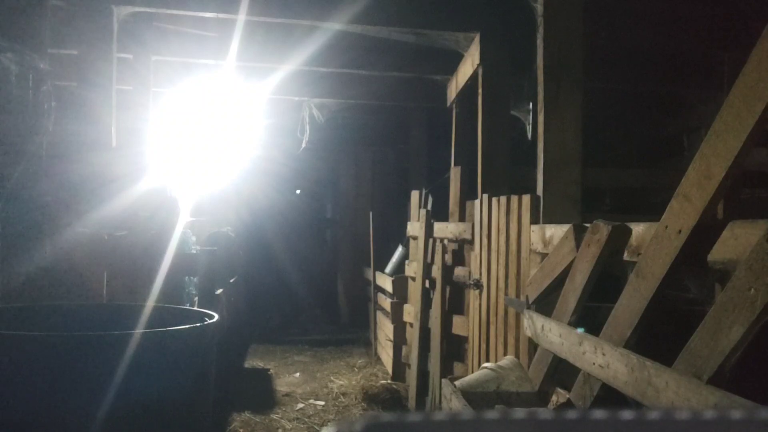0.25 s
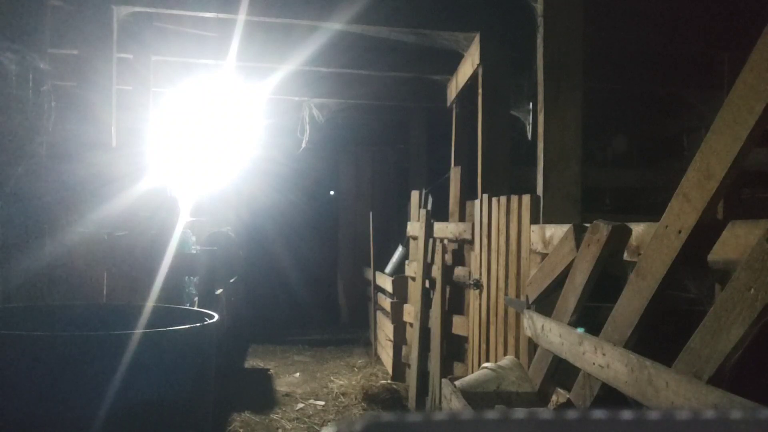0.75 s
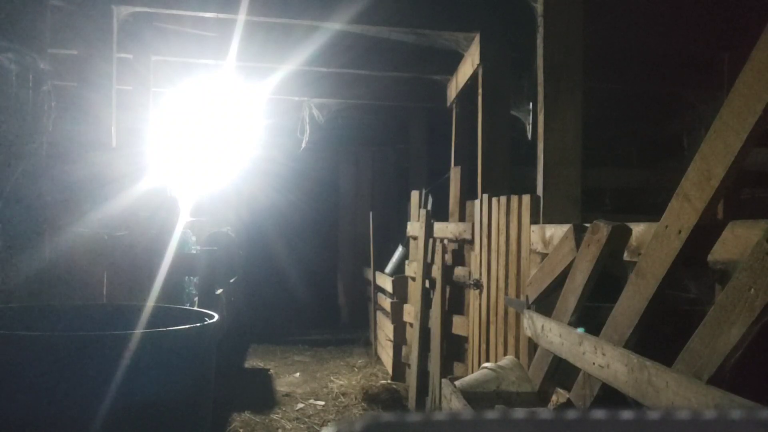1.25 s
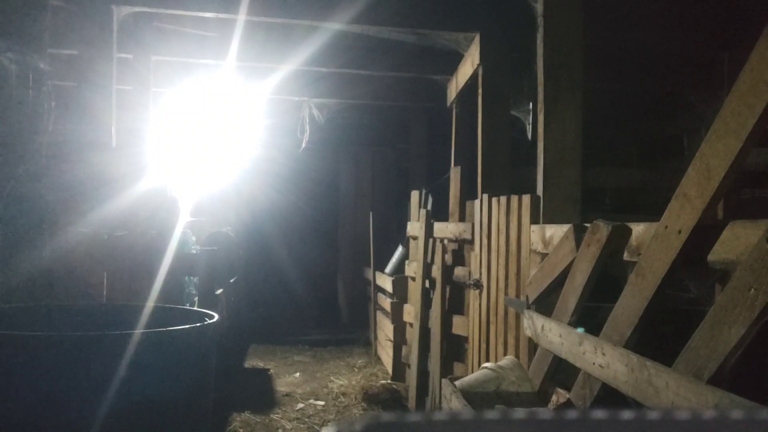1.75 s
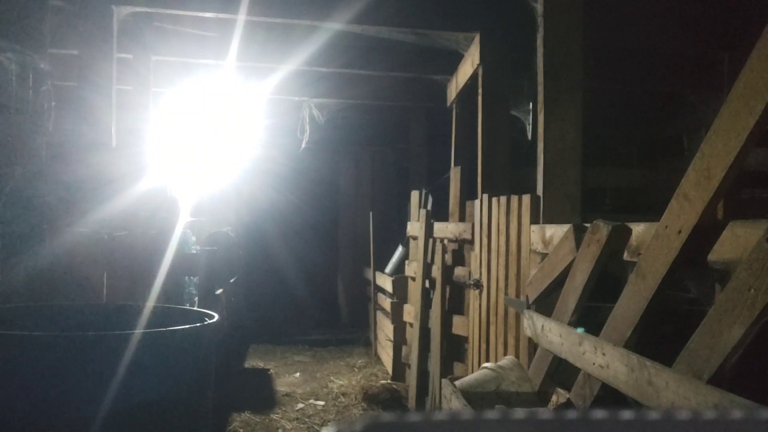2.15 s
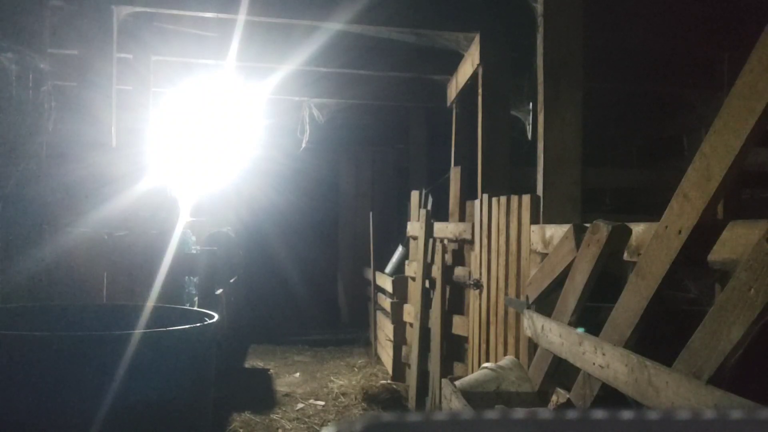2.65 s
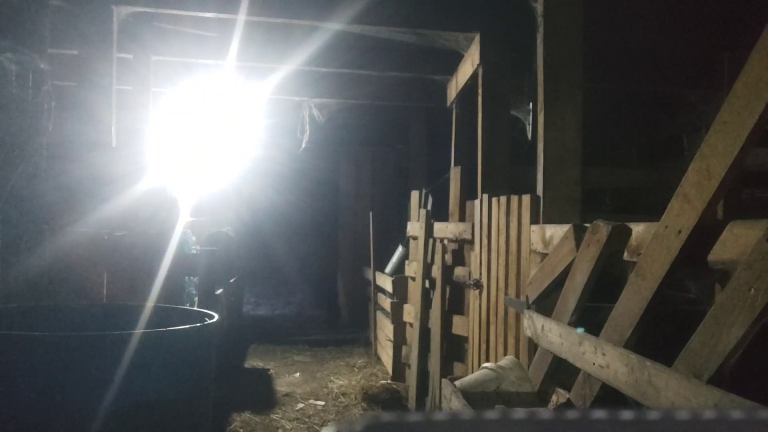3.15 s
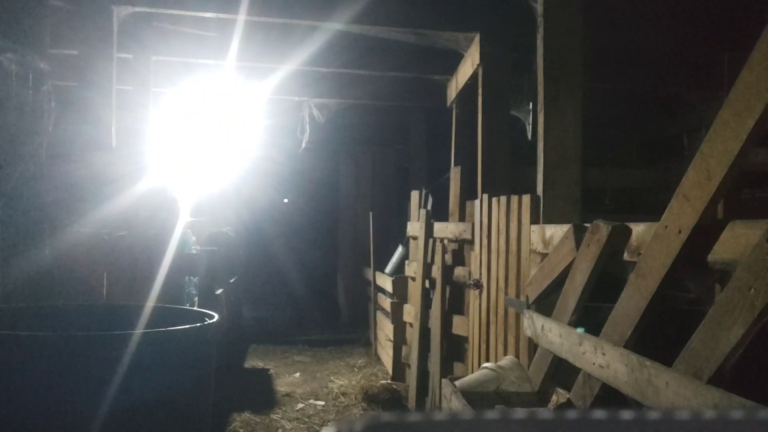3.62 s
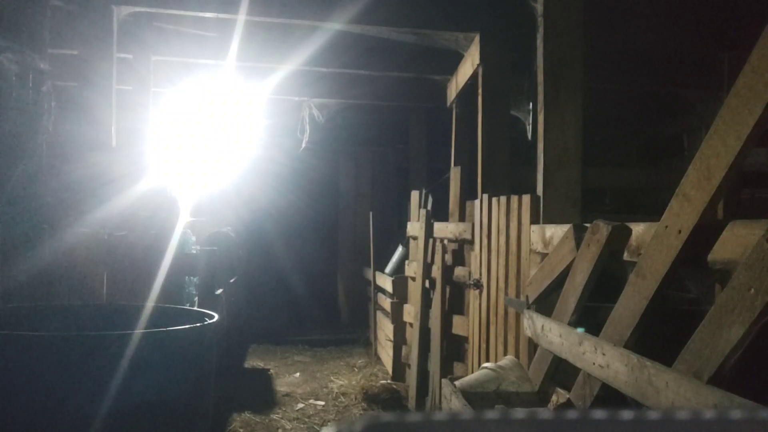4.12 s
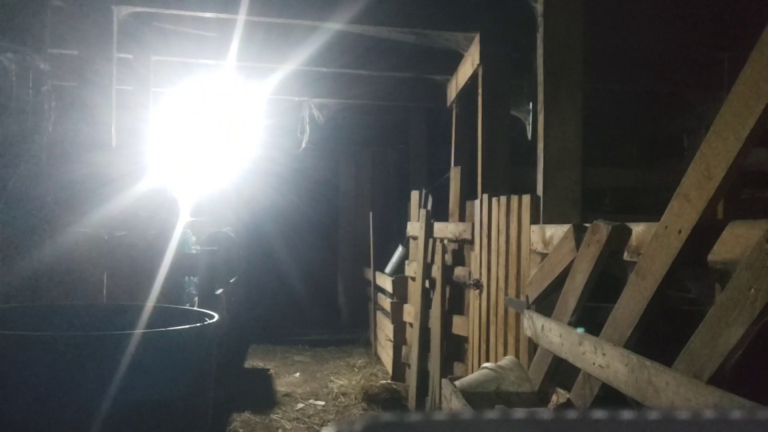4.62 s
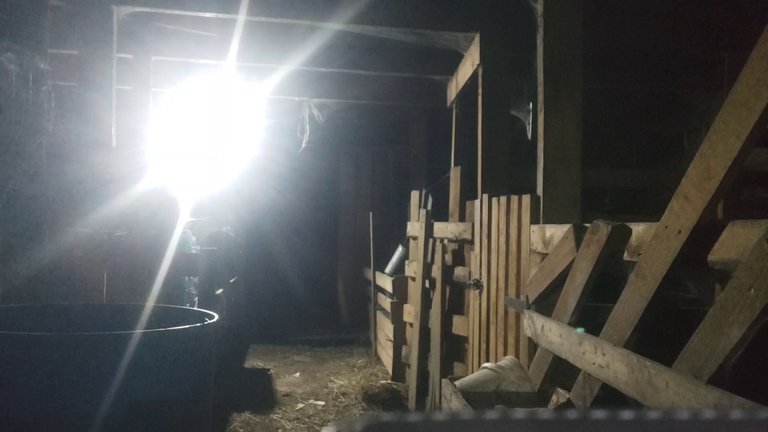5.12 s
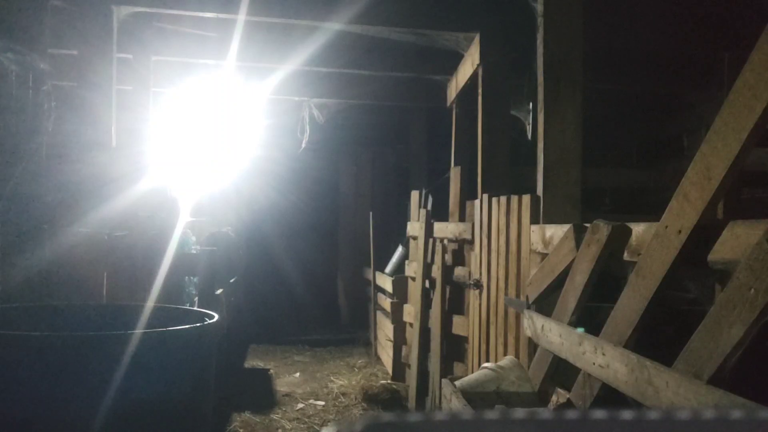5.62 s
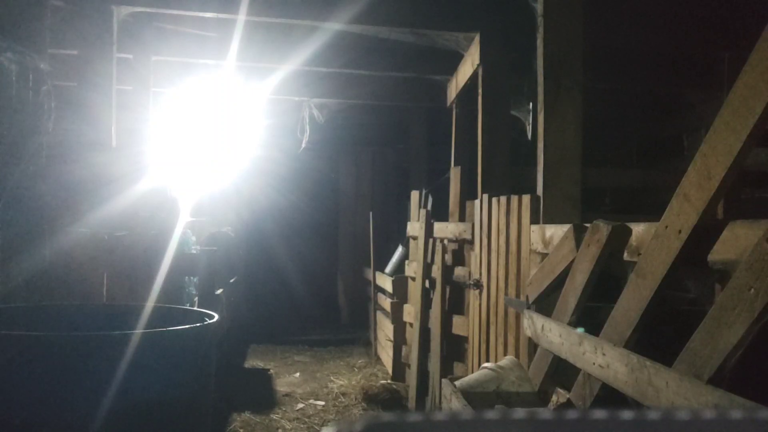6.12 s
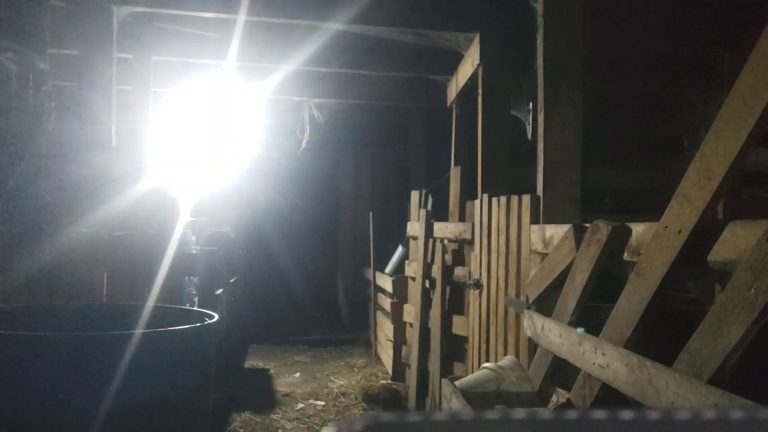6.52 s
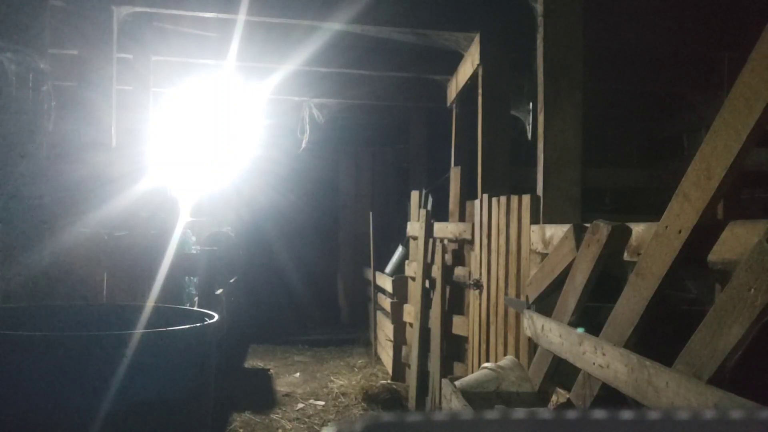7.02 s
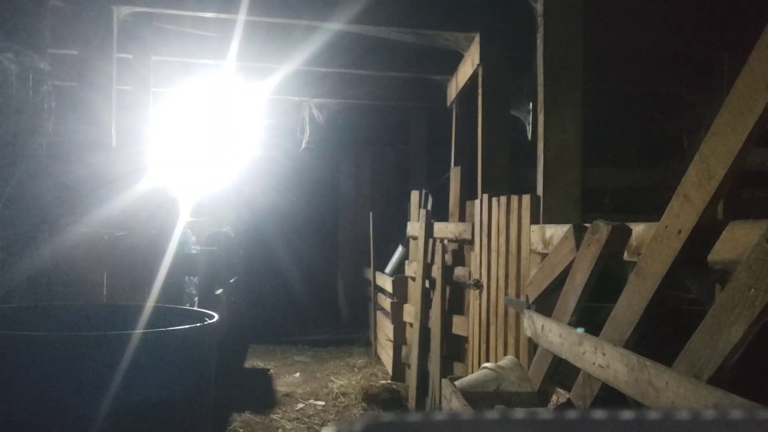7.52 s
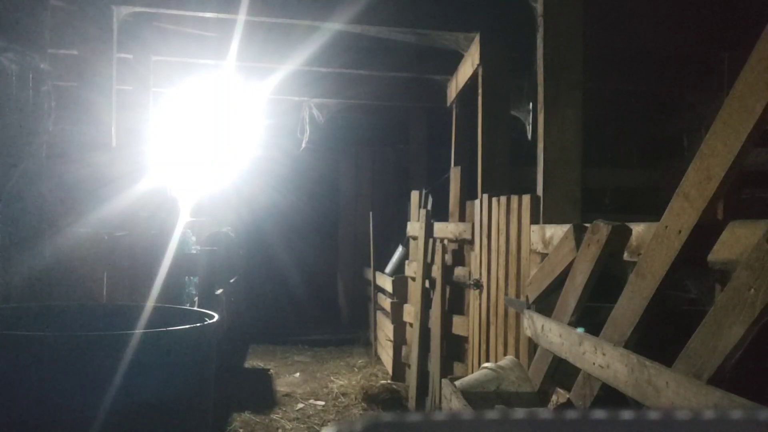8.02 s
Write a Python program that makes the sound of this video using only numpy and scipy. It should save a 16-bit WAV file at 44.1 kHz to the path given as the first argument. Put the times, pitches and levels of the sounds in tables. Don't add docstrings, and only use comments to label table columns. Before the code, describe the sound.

Hens in a wooden barn at night: straw scuffs, heavy landings and bin bangs early, then low clucks, throbbing drawn-out calls and hoarse clucking.

```python
import sys
import numpy as np
from scipy import signal
from scipy.fft import rfft, irfft, next_fast_len
from scipy.io import wavfile
from scipy.ndimage import uniform_filter1d, map_coordinates

SR = 44100
rng = np.random.default_rng(int(sys.argv[2]) if len(sys.argv) > 2 else 0)


def store_pcm(level_fs):
    pcm = np.round(np.clip(level_fs, -1, 1) * 32767).astype(np.int16)
    wavfile.write(sys.argv[1], SR, np.atleast_2d(pcm).T)


def rack_gain(trim_db):
    fader = np.asarray(trim_db, float)
    return 10 ** (fader / 20)


N = 364530
TIME = np.arange(N) / SR


def unit(x):
    return x / np.sqrt(np.mean(x ** 2) + 1e-20)


def along(points, hz):
    f, v = np.transpose(points)
    return np.interp(np.log(hz + 1), np.log(f + 1), v)


def random_curve(n, rate):
    return map_coordinates(rng.standard_normal(int(n * rate / SR) + 4), [np.arange(n) * rate / SR])


def wobble(rate):
    return random_curve(N, rate)


def filtered(x, response):
    m = next_fast_len(N + SR // 2)
    return irfft(rfft(x, m) * response(np.fft.rfftfreq(m, 1 / SR)), m)[..., :N]


def resonant(modes):
    def body(f):
        total = 0
        for k, (centre, width, db) in enumerate(modes):
            damping = 1j * f * width
            total = total + (-1) ** k * rack_gain(db) * damping / (centre * centre - f * f + damping)
        return total
    return unit(filtered(rng.standard_normal(N), body))


# (f/Hz, left-right correlation)
ALIKE = [(60, 0.15), (180, 0.53), (550, 0.38), (1650, -0.088), (4970, -0.004), (15000, -0.015)]


def rush(spectrum, patchy_db):
    z = signal.stft(rng.standard_normal((2, N)), nperseg=512)[2]
    field = uniform_filter1d(rng.standard_normal(z.shape[1:]), size=6, axis=0)
    field = uniform_filter1d(field, size=10, axis=1)
    pair = signal.istft(z * rack_gain(patchy_db * unit(field)), nperseg=512)[1][:, :N]

    def mid_side(hz):
        angle = np.arccos(np.clip(along(ALIKE, hz), -1, 1)) / 2
        return rack_gain(along(spectrum, hz)) * np.array([np.cos(angle), np.sin(angle)])
    mid, side = filtered(pair, mid_side)
    return unit(np.array([mid + side, mid - side]))


def burst(s, length, t60, attack):
    out, t = np.zeros(N + SR), np.arange(SR) / SR
    decay = rack_gain(-60 * np.clip(t - length, 0, None) / abs(t60))
    out[round(s * SR):][:SR] = (1 - np.exp(-t / attack)) * decay
    return out[:N]


# (f/Hz, level/dB)
THROAT = [(900, 2), (1300, -14), (1900, -24.5), (2250, -33.5), (2700, -41.5), (3600, -48), (4250, -34),
          (4800, -51), (6900, -51), (8000, -60)]


def voice(pitch_hz, first_db, second_db, third_db, half_db, rough, upper_db=0):
    n = len(pitch_hz)
    jitter = 1 + rough * (.03 * random_curve(n, 120) + .012 * random_curve(n, 30))
    phase = 2 * np.pi * np.cumsum(pitch_hz * jitter) / SR

    def shimmer():
        return 4 * rough * random_curve(n, 50)

    tone = np.zeros(n)
    for k, db in enumerate([first_db, second_db, third_db], 1):
        tone = tone + rack_gain(db + shimmer()) * np.sin(k * phase + k)
    effort_db = np.maximum(second_db, third_db) + upper_db
    for k in range(4, 16):
        level_db = effort_db + along(THROAT, k * pitch_hz) + shimmer()
        blur = .0005 * k * np.cumsum(random_curve(n, 300))
        tone = tone + rack_gain(level_db) * np.sin(k * phase + blur)
    for k in range(1, 5):
        octaves = np.log2((k + .5) * pitch_hz / 1000)
        halfway_db = half_db + 5 - 90 * octaves ** 2 / 2
        tone = tone + rack_gain(halfway_db + shimmer()) * np.sin((k + .5) * phase + k)
    breath = signal.lfilter(*signal.butter(5, [350, 1300], "band", fs=SR), rng.standard_normal(n))
    puffs = rack_gain(effort_db) * rough * breath * (1 + np.cos(phase))
    return np.sqrt(2) * (tone + puffs)


def clucks(rows, rise):
    out = np.zeros(N + SR)
    for s, length, hz, first_db, second_db, third_db, half_db, upper_db, sag, rough in rows:
        u = np.arange(round((length + 0.018) * SR)) / SR / length
        opening = np.clip(u * length / 0.0033, 0, 1)
        swell = 0.82 + 0.29 * np.sin(np.pi * np.clip(u, 0, 1))
        shape = opening * swell * np.exp(-1.6 * u ** 3)
        pitch = hz * (1 + rise * (np.tanh(4 * u) - .8) - rng.normal(sag, .012) * 2 * (u - .5))
        sag_db = 3.5 - 9 * u
        note = voice(pitch, first_db + sag_db, second_db, third_db, half_db, rough, upper_db)
        out[round(s * SR):][:len(u)] += rack_gain(3.5) * shape * note
    return out[:N]


# (t/s, length/s, f/Hz, fundamental level/dB, beak opening/dB = second partial over first)
BRIGHT_HEN = [
    (4.987, 0.061, 307.3, -49, 7.5),
    (5.106, 0.091, 310, -51, 7.5),
    (5.228, 0.04, 311.4, -46.5, 6),
    (5.349, 0.018, 338, -43, 7.5),
    (5.442, 0.04, 339, -47, 8),
    (6.048, 0.04, 327, -44.5, -15),
    (7.227, 0.07, 320, -46, -5.5),
    (7.39, 0.12, 318.2, -46, -3.5),
    (7.544, 0.063, 303.6, -42.5, -3.5),
]
OPEN_HEN = [
    (0.54, 0.066, 358, -50, -1),
    (0.695, 0.025, 337, -48, 4.5),
    (0.712, 0.046, 304.5, -47, 1.5),
    (7.29, 0.055, 326.6, -41.5, -11),
    (7.325, 0.027, 330, -48, -3),
]
DULL_HEN = [(2.27, 0.082, 327.5, -60.5, 9), (2.505, 0.11, 320.7, -54.5, -4),
            (2.63, 0.086, 321.5, -62, -0.5), (2.76, 0.064, 321, -60, -2), (3.891, 0.031, 337.3, -55, 14),
            (4.072, 0.025, 339.4, -54, 7.5), (4.181, 0.067, 303, -47.5, -6), (2.39, 0.11, 315.7, -60, -1),
            (5.761, 0.19, 289.5, -61.5, -6), (5.902, 0.03, 292, -55.5, -4), (6.278, 0.033, 370, -45, 4),
            (6.62, 0.015, 317, -54, -8), (6.684, 0.073, 279, -64, -7)]
HIGH_HEN = [(1.009, 0.03, 546, -60.5, 23.5), (2.06, 0.044, 448, -58, 10), (2.947, 0.07, 447, -74, 20),
            (3.124, 0.034, 450, -75, 25.5), (3.26, 0.035, 442, -79.5, 29.5), (5.496, 0.012, 450, -37, 6.5),
            (5.599, 0.089, 455, -44.5, 0.5), (6.31, 0.042, 459.5, -39.5, 5),
            (6.408, 0.041, 448.4, -40.5, 6), (6.438, 0.039, 445.5, -44, 0.5),
            (6.781, 0.055, 537, -59.5, -18), (6.95, 0.082, 525, -57.5, -22), (8.16, 0.13, 471, -65.5, 3)]
RISING_HEN = [
    (4.33, 0.098, 288, -49, 1),
    (4.41, 0.068, 315.5, -51.5, 7),
    (4.47, 0.053, 332.7, -55, 11.5),
]
RASPY_HEN = [
    (6.069, 0.044, 333.7, -52, 6.4),
    (6.115, 0.029, 331, -57.5, 5.4),
    (6.166, 0.041, 360, -47, 2),
    (6.203, 0.029, 368, -48.5, 2),
    (6.24, 0.023, 358, -53, 4.3),
]
# (third partial over fundamental level/dB, share of beak opening it follows,
# upper partials level/dB, pitch sag share)
THIRDS = [(-2, 0.4, -0.5, 0.0316), (2, 0.19, -7, 0.013), (-11, 0.69, -6, 0.02), (-20, 0.72, -2.5, 0.021),
          (-11, .3, -1.5, -0.021), (0, 1.3, -0.5, 0.0087)]
ROUGH = [.6, .5, .42, .45, .45, .85]
HALF_DB = [-28, -30, -34, -26, -30, -9]


def hens():
    flock = [BRIGHT_HEN, OPEN_HEN, DULL_HEN, HIGH_HEN, RISING_HEN, RASPY_HEN]
    rows = []
    for hen, (third_db, share, upper_db, sag), rough, half_db in zip(flock, THIRDS, ROUGH, HALF_DB):
        for s, length, hz, db, opening in hen:
            second_db = db + opening
            rows.append((s, length, hz, db, second_db, db + third_db + share * opening,
                         second_db + half_db, upper_db, sag, rough))
    return clucks(rows, rise=.03)


# (t/s, length/s, f/Hz, level/dB, half-pitch level/dB under it)
HOARSE = [(6.194, 0.044, 441, -45, -23), (6.356, 0.024, 475, -50, -8), (6.385, 0.02, 447, -46.5, -5),
          (6.455, 0.028, 432, -47, -12), (7.421, 0.044, 364.4, -46.5, -11.5), (7.515, 0.095, 376, -48, -5),
          (7.627, 0.11, 381.7, -46.5, -22), (7.732, 0.023, 398, -51, -2), (7.749, 0.053, 403, -45, -10),
          (7.837, 0.067, 396, -46, -9), (7.877, 0.042, 430, -41, -12), (7.922, 0.034, 424.5, -49.5, -7),
          (7.983, 0.079, 431.4, -44, -3), (8.04, 0.052, 430, -49.5, 0)]
# (f/Hz, width/Hz, level/dB)
RASP = [(1820, 300, 9), (4080, 130, -1)]


def cackle():
    opening_per_hz, even_pitch_hz = 0.13, 430
    rows = []
    for s, length, hz, db, half_db in HOARSE:
        first_db = db - opening_per_hz * (hz - even_pitch_hz)
        rows.append((s, length, hz, first_db, db, db - 8.5, db + half_db, 3, 0.028, .6))
    notes = clucks(rows, rise=.03)
    rasp = np.abs(filtered(notes, lambda hz: hz > 600)) * resonant(RASP)
    return notes + rack_gain(-27) * rasp


def calls(tables, third_db, rough, throb_db):
    out = np.zeros(N)
    for rows in tables:
        s, *cols = np.transpose(rows)
        on = (TIME >= s[0]) & (TIME < s[-1])
        hz, first_db, opening_db = (np.interp(TIME[on], s, c) for c in cols)
        second_db = first_db + opening_db
        third = np.maximum(first_db, second_db) + third_db
        ends = signal.windows.tukey(on.sum(), .03)
        out[on] += ends * voice(hz, first_db, second_db, third, second_db - 52.5, rough)
    throb = np.sin(2 * np.pi * np.cumsum(22 + 5 * wobble(6)) / SR)
    out = out * rack_gain(throb_db * (.5 * wobble(40) + throb) - 1.5)
    return signal.sosfilt(signal.butter(4, 300, "high", fs=SR, output="sos"), out)


# (t/s, f/Hz, fundamental level/dB, beak opening/dB)
CALL = [
    [(4.54, 489.7, -55, 2), (4.575, 501, -39.5, -7.5), (4.62, 508.5, -40.5, -6),
     (4.668, 528.7, -39.5, -2.5), (4.78, 532.7, -42.5, -0.5), (4.88, 528, -42, 7), (5.03, 537, -42, 9),
     (5.15, 546.4, -41, 10.5), (5.24, 556, -45, 3)],
    [(5.288, 546, -47, 7.5), (5.305, 540, -42.5, 16), (5.333, 544, -44, -6), (5.362, 537, -49, 17.5),
     (5.39, 547, -62, 8)],
    [(5.451, 524, -38.5, 9), (5.48, 529.7, -36, 9), (5.542, 539, -35, 4), (5.62, 542, -44.5, 12.5),
     (5.69, 546, -45, -11), (5.76, 560, -89, 5)],
]
# (t/s, level/dB)
CATCHES = [(4.649, -22), (4.72, -11), (4.852, -7), (4.905, -13), (4.94, -11), (5.022, -10), (5.042, -10),
           (5.088, -9), (5.128, -12), (5.172, -16), (5.196, -21), (5.218, -16), (5.506, -17), (5.531, -1),
           (5.558, -16), (5.596, -12)]


def near_call():
    catch_s = 0.0065
    breaks_db = sum(db * np.exp(-((TIME - s) / catch_s) ** 2) for s, db in CATCHES)
    return calls(CALL, third_db=-25, rough=.45, throb_db=1.5) * rack_gain(breaks_db)


# (t/s, f/Hz, fundamental level/dB, beak opening/dB)
FAR_CALL = [
    [(0.0, 662, -62, -17), (0.1, 672, -67, 4), (0.15, 692, -66.5, -3), (0.27, 672, -59.5, -9),
     (0.33, 672, -62.5, -11), (0.38, 666, -51.5, -10), (0.47, 653, -57.5, -13.5), (0.57, 655, -59, -11)],
    [(5.7, 581, -42.5, -20), (5.74, 577.6, -58, -27), (5.894, 574, -61.5, -27), (6.02, 564, -69, -24)],
    [(5.21, 565.3, -47, 9), (5.29, 574, -49, -11), (5.36, 570, -43.5, -15), (5.44, 558, -47, -1)],
    [(2.44, 453, -84, 12), (2.52, 451, -72, 12), (2.61, 450, -71.5, 12), (2.65, 500.5, -71, 17),
     (2.72, 500.5, -73, 9.5), (2.8, 468.7, -66.5, 7.3), (2.91, 481, -72.5, 11.6), (3.04, 428, -69.5, 15),
     (3.1, 431, -82, 15)],
]


def far_call():
    return calls(FAR_CALL, third_db=-26.5, rough=.55, throb_db=3.5)


# (t/s, boom level/dB, knock level/dB, roll length/s, t60/s)
THUMPS = [
    (.005, -40, -68, 0.013, 0.2),
    (0.836, -24.5, -29, 0.036, 0.63),
    (1.546, -26, -31.5, 0.017, 0.45),
    (1.063, -54, -47.5, 0.16, 1),
    (1.57, -38, -52, 0.14, 0.24),
    (1.806, -73, -30.5, 0.014, 0.42),
    (1.81, -34.5, -65, 0.031, 0.93),
    (2.208, -50, -49, 0.14, 0.97),
    (3.685, -53, -55, 0.025, 0.323),
]
# (f/Hz, width/Hz, level/dB)
BOOM = [(56.5, 26, 2), (88.4, 45.7, 2.5), (183.6, 29.5, 1.5)]
# (f/Hz, width/Hz, level/dB)
KNOCK = [(235, 150, -6), (358, 68, 1), (634, 50, -12), (1043, 48, -17.5), (2370, 120, -20), (3000, 55, -18)]


def thumps():
    boom = knock = tick = 0
    for s, boom_db, knock_db, length, t60 in THUMPS:
        boom = boom + rack_gain(boom_db) * burst(s, length, t60, attack=0.028)
        knock = knock + rack_gain(knock_db) * burst(s, length, 0.6 * t60, attack=0.006)
        tick = tick + rack_gain(knock_db - 23.0) * burst(s, length, 0.59 * t60, attack=0.002)
    return boom * resonant(BOOM) + knock * resonant(KNOCK[:4]) + tick * resonant(KNOCK[4:])


# (t/s, level/dB, held/s, t60/s)
BANGS = [
    (1.544, -31.5, 0.017, 0.23),
    (1.802, -37, 0.012, 0.26),
]
# (f/Hz, width/Hz, level/dB)
BIN = [(646, 35, 6), (755, 54, -6), (1074, 55, -6.5), (1670, 68, -2.5), (1923, 40, -10), (2275, 57, 1),
       (2930, 170, -2.5), (3770, 180, -7)]


def bangs():
    rattle = sum(rack_gain(db) * burst(s, held, t60, attack=0.00058) for s, db, held, t60 in BANGS)
    crack = sum(rack_gain(db - 1.0) * burst(s, 0.0018, 0.047, attack=.0002) for s, db, *_ in BANGS)
    blows = rattle * resonant(BIN) + crack * resonant([(2520, 1900, 0)])
    return filtered(blows, lambda hz: 1 / (1 + (hz / 8000) ** 16))


# (t/s, peak level/dB, low part level/dB, scrape length/s, t60/s)
SCRAPES = [(0.512, -46.5, -2.5, 0.031, 0.084), (0.691, -52, 4, 0.05, 0.3), (0.805, -41, 6, 0.1, 0.76),
           (0.847, -35, -10, 0.059, 0.28), (0.998, -34, 0.5, 0.028, 0.26),
           (1.3327, -42.5, 2.5, 0.038, 0.11), (1.516, -44.5, -8, 0.02, 0.42),
           (1.932, -48.5, 2.5, 0.037, 0.076), (2.187, -39, 2, 0.02, 0.46), (2.56, -50.5, -26, 0.016, 0.18),
           (2.984, -50, 1, 0.24, 0.52), (3.33, -50, -17, 0.028, 0.24), (3.713, -45.5, -5, 0.15, 0.2),
           (4.225, -40.5, -21, 0.063, 0.67), (4.553, -49, -9, 0.027, 0.18), (4.779, -46, -1, 0.049, 0.4),
           (5.1, -36, -34, 0.0046, 0.11), (5.797, -60, -17, 0.06, 0.39), (7.221, -62, -23, 0.062, 0.3),
           (7.601, -60.5, -15, 0.061, 0.34)]
# (t/s, peak level/dB, low part level/dB, length/s, t60/s)
SLAPS = [(0.3785, -54, 16, 0.012, 0.17), (0.577, -59, 18.5, 0.037, 0.099), (1.541, -27, 1, 0.015, 0.43),
         (1.801, -30, 4.5, 0.0072, 0.26), (2.747, -52.5, 8.5, 0.06, 0.16), (3.683, -42, 9, 0.01, 0.68),
         (3.815, -53, 18, 0.006, 0.093), (3.936, -51, 8.5, 0.0096, 0.054),
         (4.141, -44.5, 12.5, 0.006, 0.092), (4.254, -48.5, 9.5, 0.013, 0.51),
         (4.466, -69, 28, 0.014, 0.085), (6.575, -45.5, 9.5, 0.032, 0.16), (6.987, -47, 6, 0.039, 0.16)]
# (f/Hz, level/dB per Hz)
FINE = [(2500, -18), (4500, -8.5), (6000, -7), (7200, 3.5), (8500, -12.5), (9300, -12.5), (10000, -26),
        (11000, -71)]
# (f/Hz, level/dB per Hz)
TOP = [(9300, -33), (10400, 10), (11200, -7.5), (12500, -8.5), (15000, -27)]


def scuffs():
    low, fine, top = np.zeros((3, N))
    for rows, top_db in [(SCRAPES, -24), (SLAPS, -67)]:
        for s, db, low_db, length, t60 in rows:
            shape = burst(s, length, t60, attack=0.0058)
            contact = burst(s, 0.014, 0.14, attack=0.00035)
            snap = burst(s, 0, 0.02, attack=.0002)
            fine += rack_gain(db - 13.0) * (shape + 1.21 * contact + 0.68 * snap)
            low += rack_gain(db + low_db - 13.5) * (shape + 0.6 * contact)
            top += rack_gain(db + top_db - 0.5) * (shape ** 2 + 2.1 * contact)
    grain = rack_gain(0.77 * wobble(160))
    wood = [(300, -4.5), (600, 0.5), (1200, 3.5), (1700, -2.0), (2600, -2.5), (4000, -12.5), (6000, -38)]
    slats = rush(wood, patchy_db=2.2)
    bright = fine * rush(FINE, patchy_db=4.0) + top * rush(TOP, patchy_db=9)
    return grain * (bright * rack_gain([[-2.2], [2.2]]) + low * slats * rack_gain([[-1.1], [1.1]]))


# (t/s, level/dB, t60/s)
TICKS = [
    (0.81, -49.5, 0.04),
    (0.838, -45, 0.032),
    (1.524, -52, 0.03),
    (3.685, -48, 0.04),
    (3.716, -41, 0.02),
    (3.819, -39, 0.048),
    (4.144, -46, 0.034),
    (4.265, -45, 0.05),
    (6.052, -57.5, 0.05),
]
# (f/Hz, width/Hz, level/dB)
TICK = [(1270, 610, -0.5), (2500, 900, -5), (7000, 1500, -10.5)]
# (t/s, level/dB, held/s, t60/s)
PLANK_HUMS = [
    (2.1, -52, 0.3, 0.5),
    (4.5, -58, 0.2, 0.5),
    (8.18, -59, 0.1, 0.5),
]
# (f/Hz, width/Hz, level/dB)
PLANK = [(179, 17, 0)]


def ticks():
    tapping = sum(rack_gain(db) * burst(s, 0, t60, attack=0.00022) for s, db, t60 in TICKS)
    humming = sum(rack_gain(db) * burst(s, held, t60, attack=0.033) for s, db, held, t60 in PLANK_HUMS)
    taps = filtered(tapping * resonant(TICK), lambda hz: hz < 8800)
    hum = humming * resonant(PLANK)
    return taps * rack_gain([[-1], [1]]) + hum * rack_gain([[2], [-2]])


# (t/s, stirring level/dB, crispness/dB)
STIR = [(0.2, -70, 8.5), (0.64, -66.5, 7.5), (0.92, -60.5, 7), (1.13, -76.5, 15), (1.63, -64.5, 2.5),
        (1.75, -66.5, 8), (2.19, -53.5, -4), (2.5, -65, -5), (3.039, -57.5, 0.5), (3.4, -68.5, 11.5),
        (3.8, -75, 14), (4.25, -58, -2.5), (4.85, -64.5, 3), (5.35, -57.5, 1), (5.85, -73.5, 5),
        (6.3, -57.5, -8.5), (6.77, -75.5, 5.5), (8.1, -70.5, 2.5)]
# (f/Hz, level/dB per Hz)
STRAW = [(110, -11.5), (180, 2.5), (260, 2), (500, 6), (1000, -2), (2500, -13), (4000, -25.5), (6000, -40)]
# (f/Hz, level/dB per Hz)
CHAFF = [(2500, -11.5), (4500, -12), (6000, -6.5), (7200, 0.5), (8500, -12.5), (9300, -11.5), (10000, -2),
         (11000, -77)]
# (f/Hz, level/dB per Hz)
AIR = [(24, -31), (40, 3.5), (117, -8), (224, -4), (417, -6.5), (522, -29), (704, -25), (818, -11.5),
       (1130, -32), (3150, -28), (5180, -37), (6990, -42), (8970, -28.5), (10700, -28), (12600, -36.5),
       (15500, -49)]
# (t/s, level/dB, held/s, t60/s)
JOLTS = [
    (0.88, -30, 0.15, 1.1),
    (1.35, -42, 0.048, 0.79),
    (1.64, -29.5, 0.38, 1.8),
    (2.15, -55, 0.45, 1.1),
    (2.7, -44, 0.049, 0.25),
    (2.98, -54, 0.063, 1.2),
    (3.4, -56, 0.48, 0.8),
]


def background():
    s, straw_db, crisp_db = np.transpose(STIR)
    straw_gain = rack_gain(np.interp(TIME, s, straw_db) + 10.0 + 1.2 * wobble(8.1))
    straw = straw_gain * rush(STRAW, patchy_db=2.5)
    chaff_gain = rack_gain(np.interp(TIME, s, straw_db + crisp_db) - 2 + 2.5 * wobble(9))
    chaff = chaff_gain * rush(CHAFF, patchy_db=2) * rack_gain([[-2], [2]])
    swing = rack_gain(-61) + sum(rack_gain(db) * burst(s, held, t60, attack=0.05) for s, db, held, t60 in JOLTS)
    sway = swing * resonant([(14.0, 3.84, -1.5), (31.8, 15.7, -15)]) * rack_gain([[1.8], [-2.2]])
    air = rack_gain(-58.5) * rush(AIR, patchy_db=1.2)
    return air + straw + chaff + sway


# (f/Hz, t60/s)
BARN = [(100, .5), (300, .3), (1000, .27), (8000, .25)]


def barn(x, pan_db, lag, walls_db, tail_db):
    hz, t, z = signal.stft(rng.standard_normal((2, SR // 2)), SR, nperseg=256)
    reply = signal.istft(z * rack_gain(-60 * t / along(BARN, hz)[:, None]), SR, nperseg=256)[1]
    reply = rack_gain(tail_db) * np.pad(reply / np.linalg.norm(reply[0]), ((0, 0), (600, 0)))
    delays = rng.integers(60, 1200, (2, 7))
    reply[[[0], [1]], delays] += rack_gain(walls_db) * rng.choice([-1, 1], (2, 7))
    reply[[0, 1], [lag, 0]] += rack_gain([pan_db / 2, -pan_db / 2])
    return signal.fftconvolve(x[None], reply, axes=1)[:, :N]


# (f/Hz, left-right level/dB)
PORTS = [(400, 3.5), (1000, -0.5), (4400, -4.5)]


def ports(birds):
    return filtered(birds, lambda hz: rack_gain(along(PORTS, hz) * np.array([[.5], [-.5]])))


def scene():
    hoarse = barn(cackle(), pan_db=-0.5, lag=14, walls_db=-15, tail_db=-9)
    flock = barn(hens(), pan_db=3.5, lag=20, walls_db=-13.5, tail_db=-7)
    caller = barn(near_call(), pan_db=0.2, lag=4, walls_db=-18, tail_db=-8)
    far = barn(far_call(), pan_db=0.2, lag=4, walls_db=-13, tail_db=-3)
    birds = ports(hoarse + flock + caller + far)
    boards = barn(thumps(), pan_db=4.5, lag=4, walls_db=-26, tail_db=-17)
    feed_bin = barn(bangs(), pan_db=3.5, lag=4, walls_db=-16, tail_db=-21)
    return birds + boards + feed_bin + scuffs() + ticks() + background()


# (f/Hz, level/dB)
TREBLE_EDGE = [(20, 0), (9000, 0), (9500, -16), (10300, -14), (10900, -5), (15650, -5), (15760, -60)]


def treble_edge(sound):
    return filtered(sound, lambda hz: rack_gain(along(TREBLE_EDGE, hz)))


def band_limit(x):
    return signal.sosfilt(signal.butter(12, 15720, fs=SR, output="sos"), x)


def record(dry):
    mix = treble_edge(dry)
    return band_limit(mix)


dry = scene()
out = record(dry)
store_pcm(out)
```